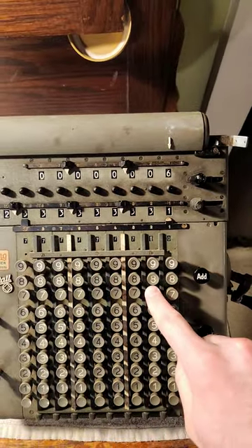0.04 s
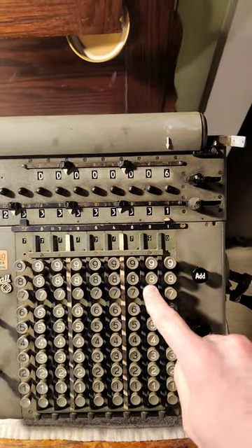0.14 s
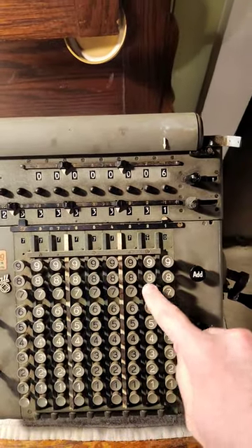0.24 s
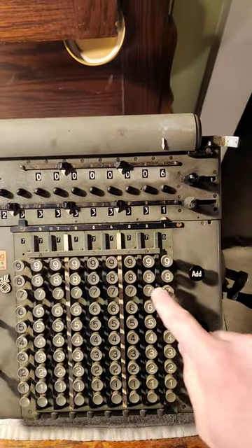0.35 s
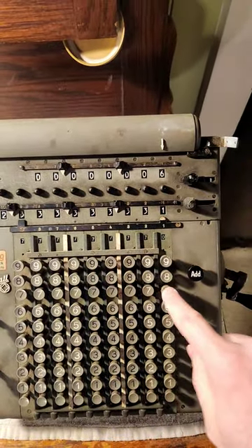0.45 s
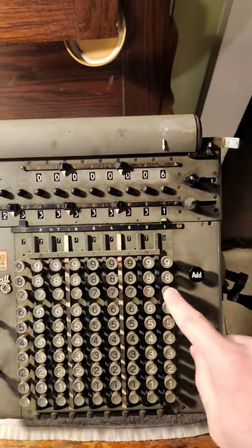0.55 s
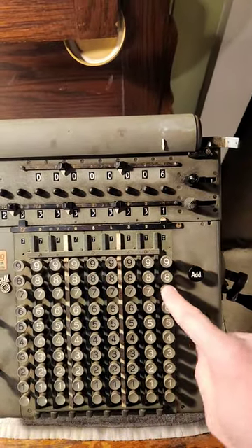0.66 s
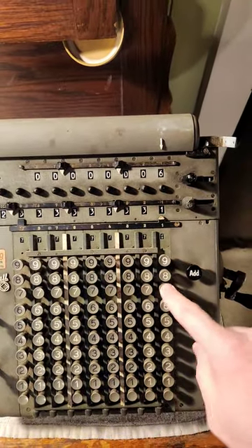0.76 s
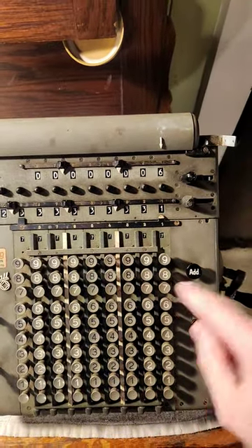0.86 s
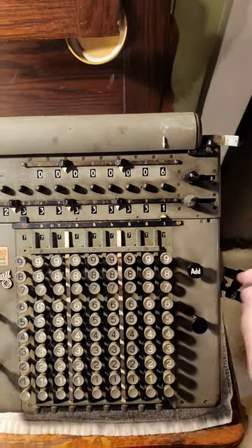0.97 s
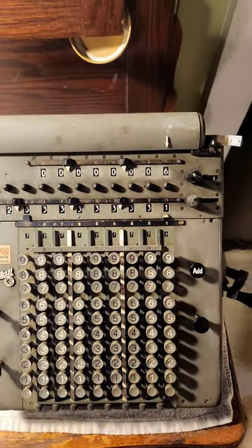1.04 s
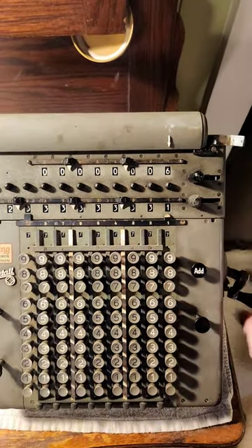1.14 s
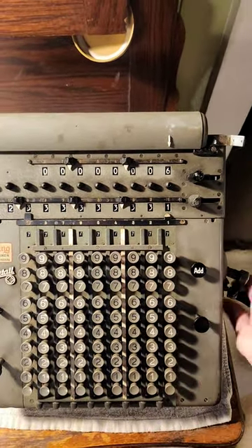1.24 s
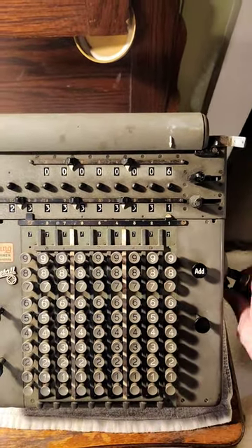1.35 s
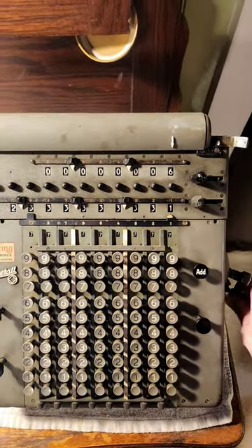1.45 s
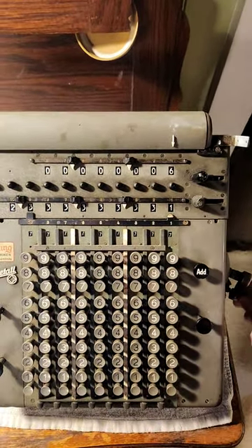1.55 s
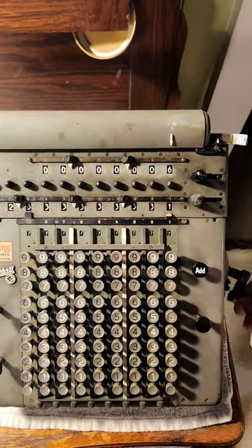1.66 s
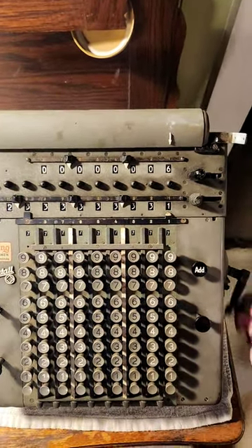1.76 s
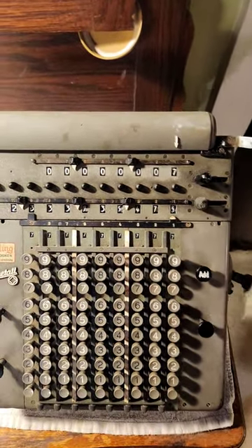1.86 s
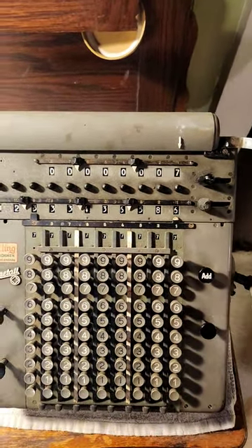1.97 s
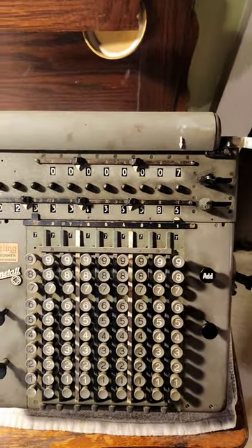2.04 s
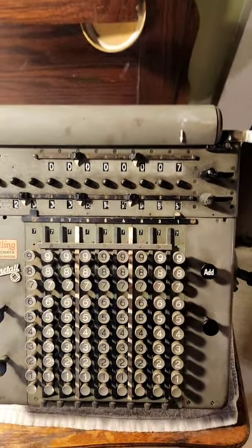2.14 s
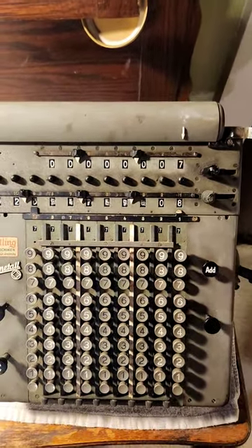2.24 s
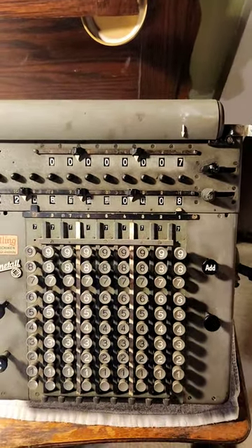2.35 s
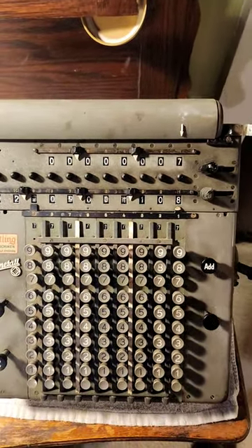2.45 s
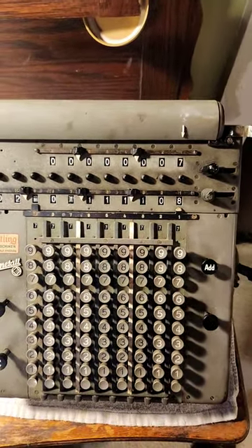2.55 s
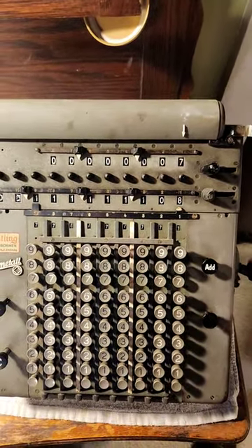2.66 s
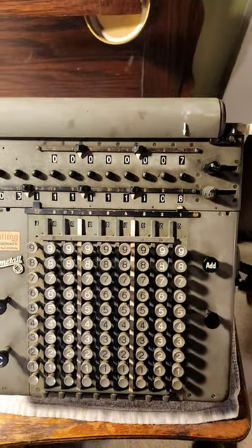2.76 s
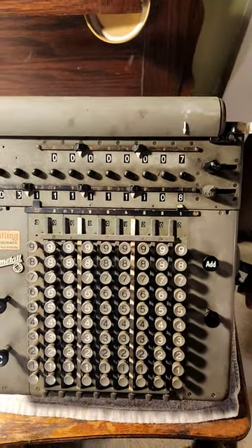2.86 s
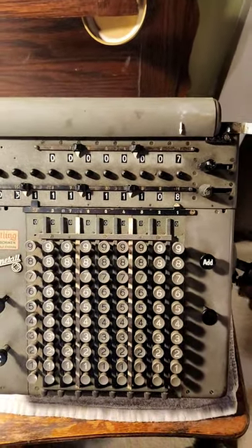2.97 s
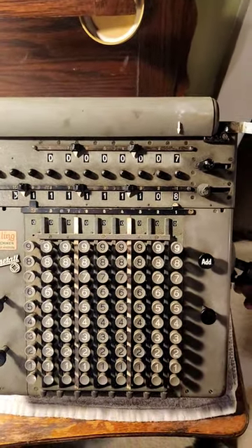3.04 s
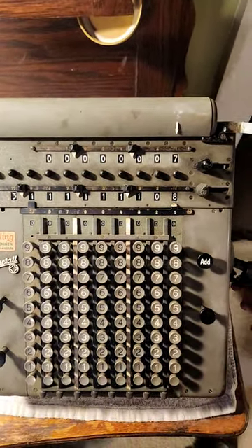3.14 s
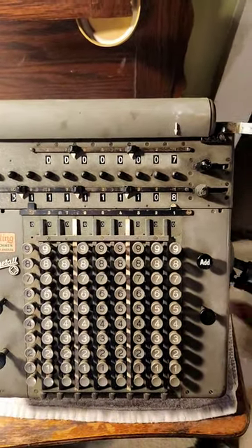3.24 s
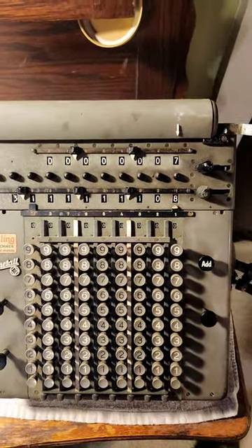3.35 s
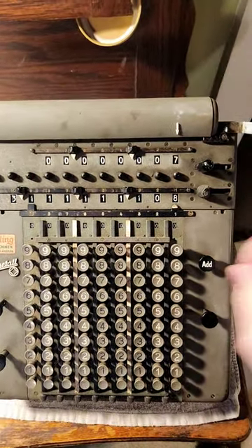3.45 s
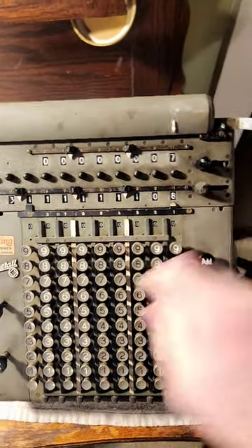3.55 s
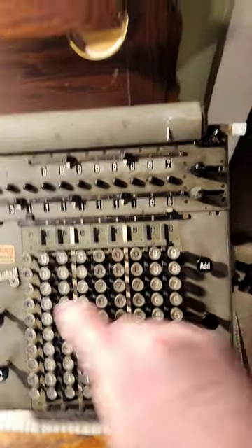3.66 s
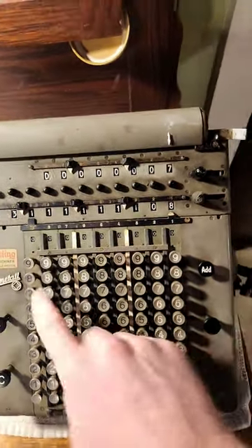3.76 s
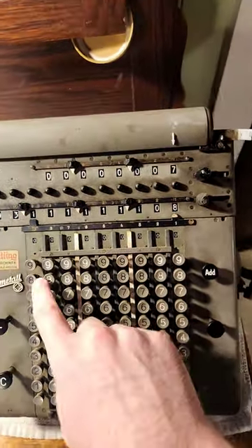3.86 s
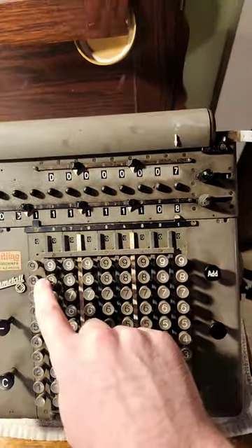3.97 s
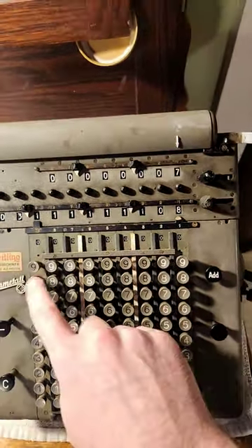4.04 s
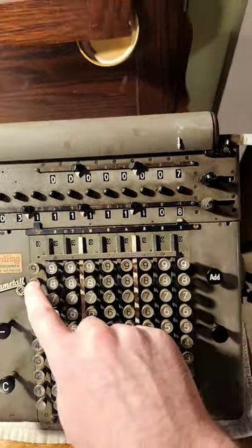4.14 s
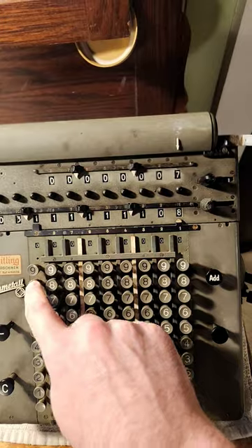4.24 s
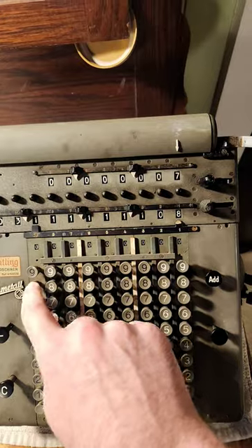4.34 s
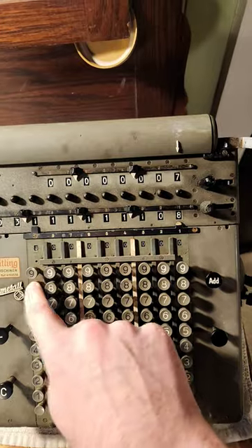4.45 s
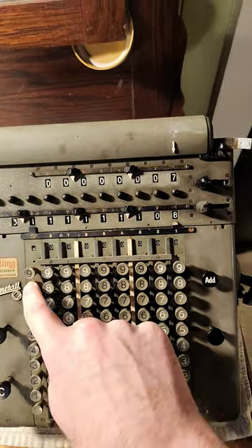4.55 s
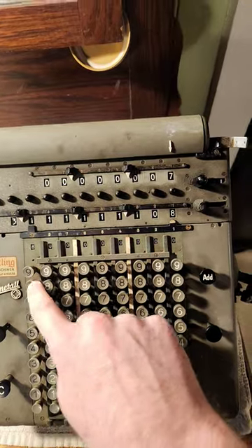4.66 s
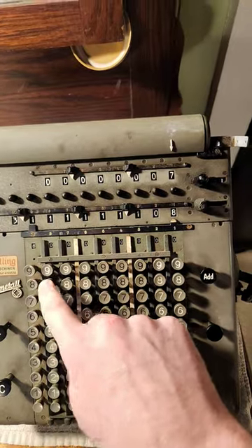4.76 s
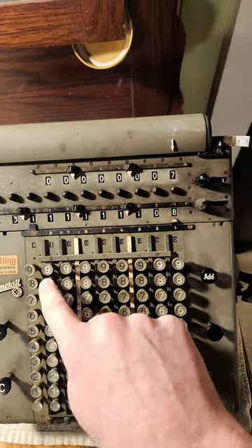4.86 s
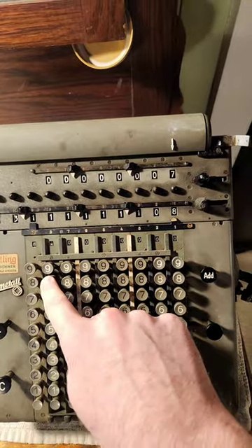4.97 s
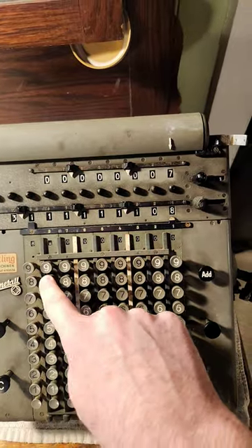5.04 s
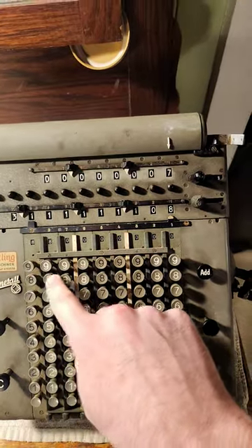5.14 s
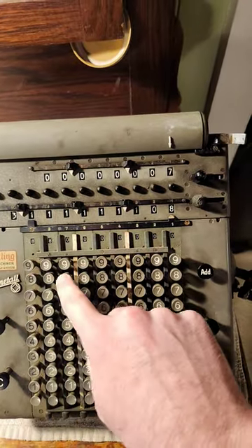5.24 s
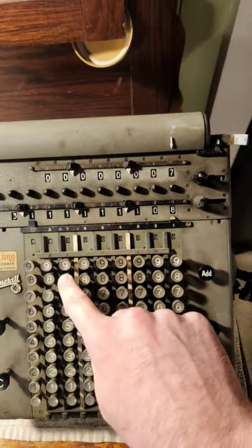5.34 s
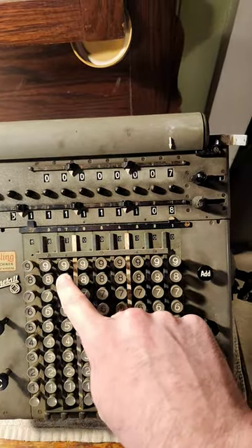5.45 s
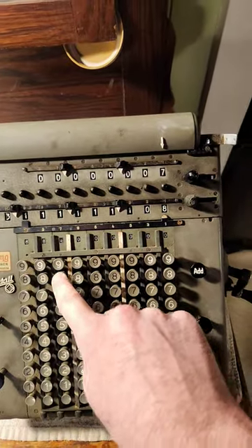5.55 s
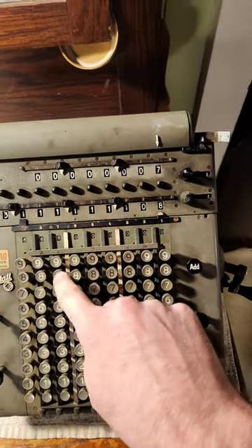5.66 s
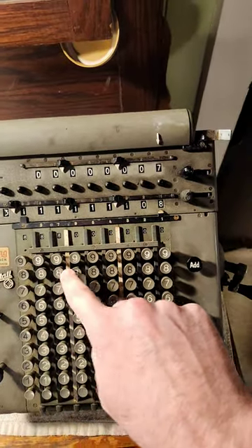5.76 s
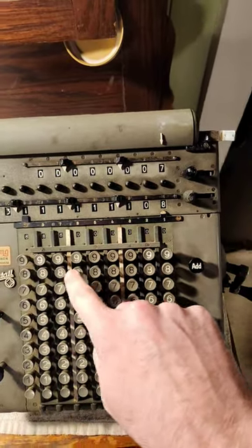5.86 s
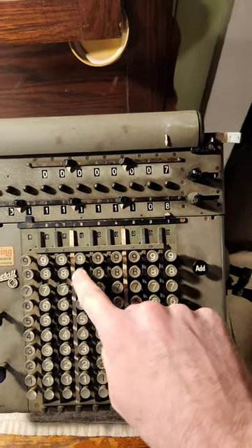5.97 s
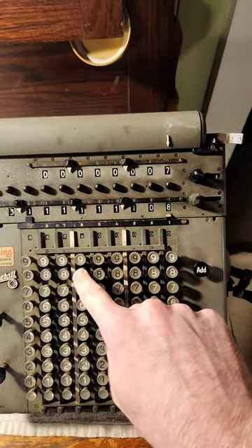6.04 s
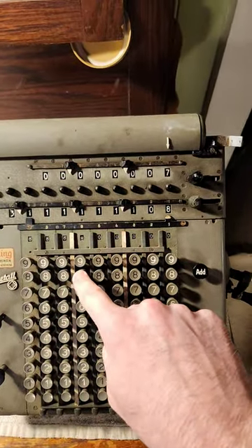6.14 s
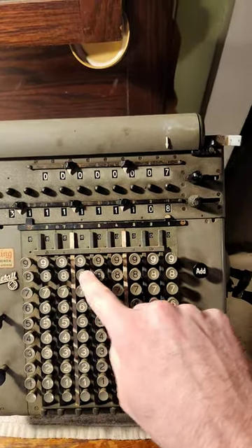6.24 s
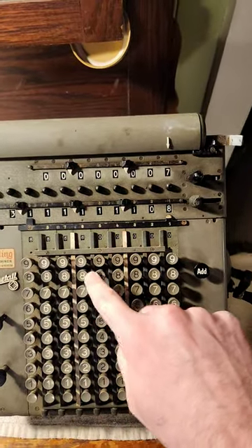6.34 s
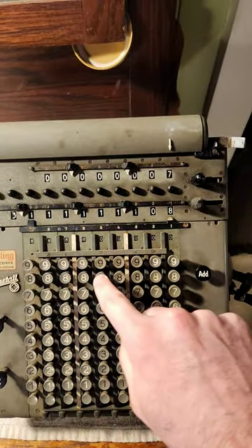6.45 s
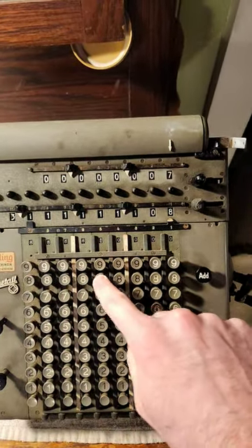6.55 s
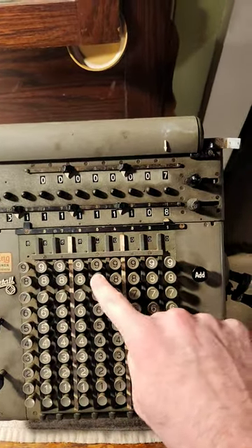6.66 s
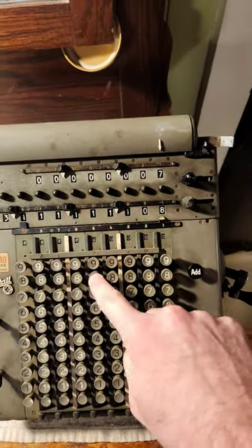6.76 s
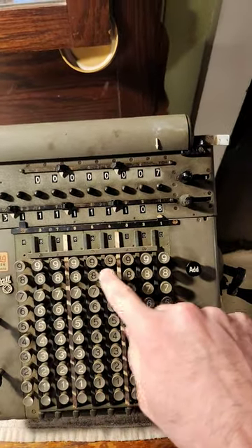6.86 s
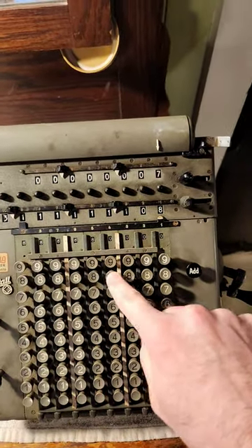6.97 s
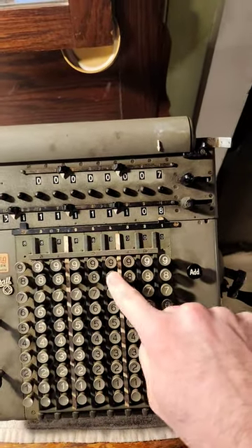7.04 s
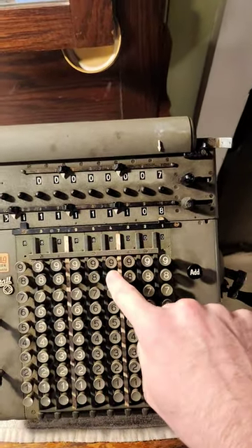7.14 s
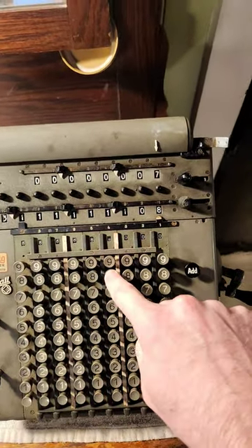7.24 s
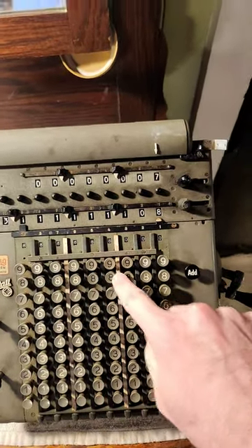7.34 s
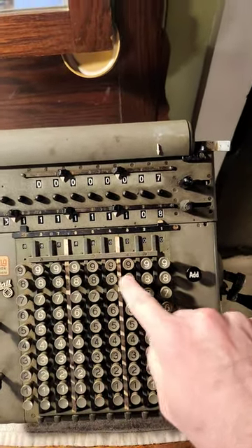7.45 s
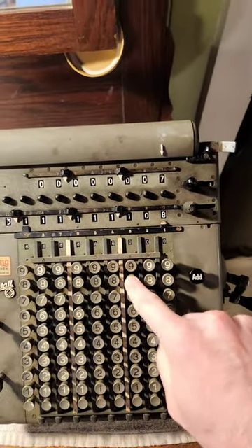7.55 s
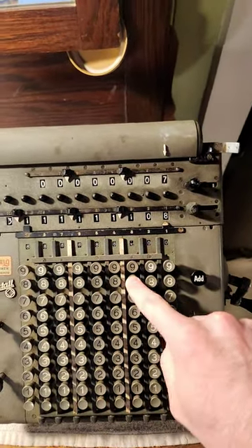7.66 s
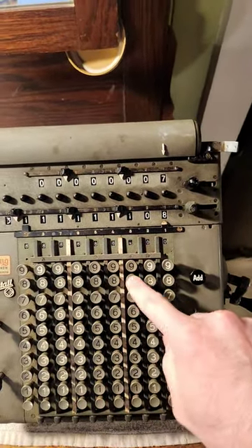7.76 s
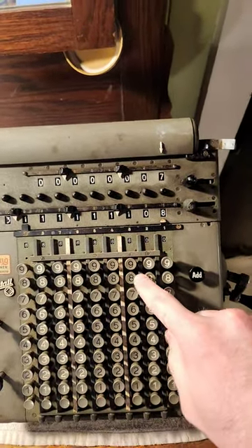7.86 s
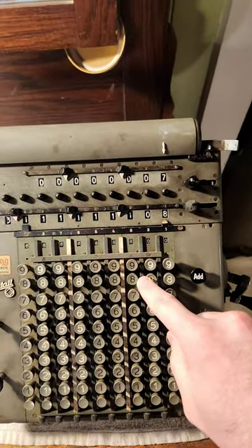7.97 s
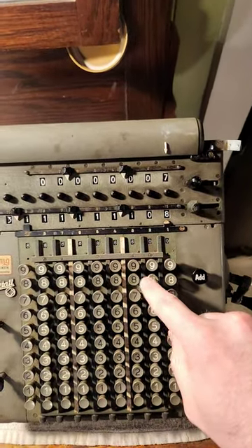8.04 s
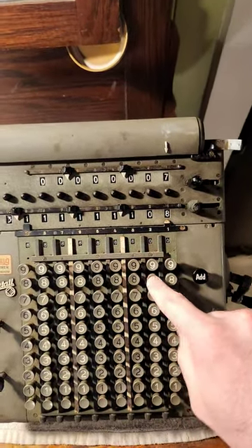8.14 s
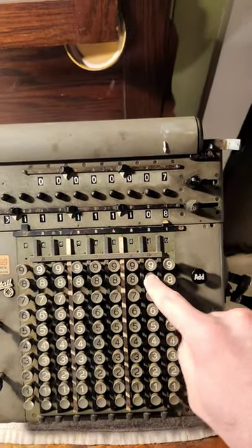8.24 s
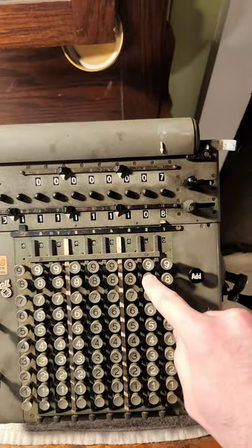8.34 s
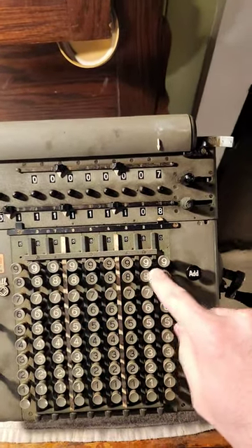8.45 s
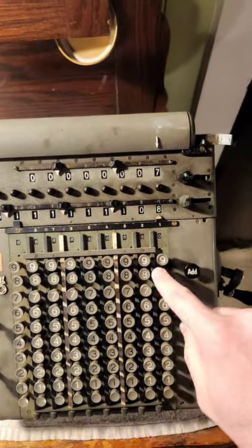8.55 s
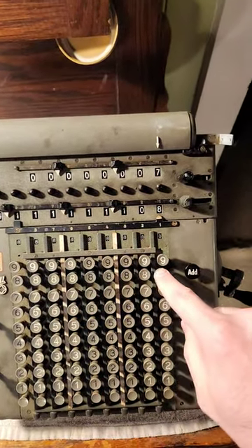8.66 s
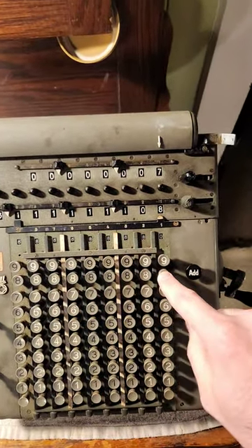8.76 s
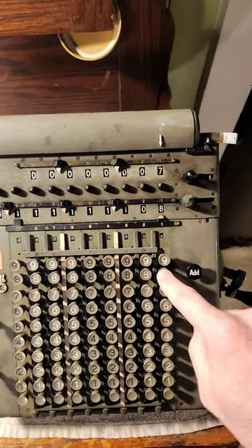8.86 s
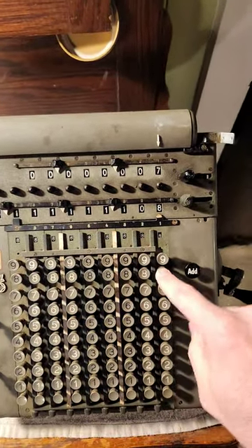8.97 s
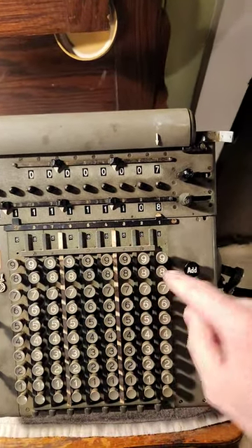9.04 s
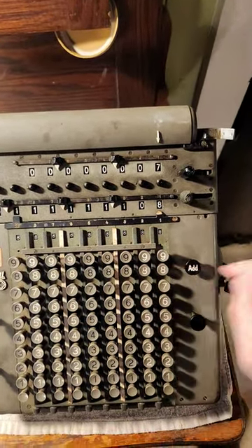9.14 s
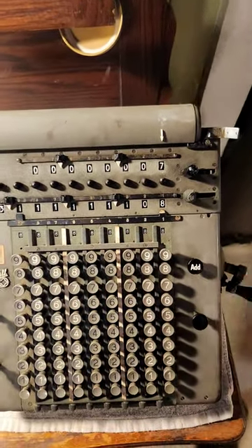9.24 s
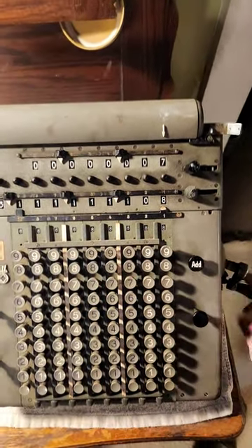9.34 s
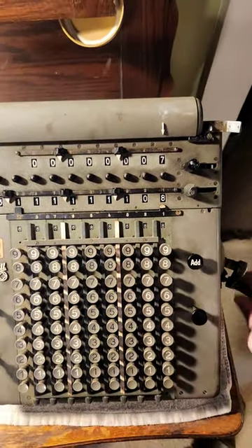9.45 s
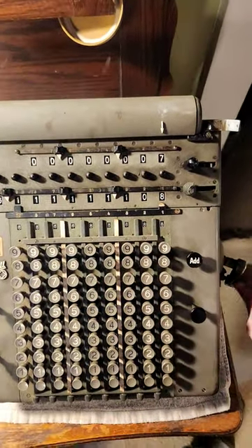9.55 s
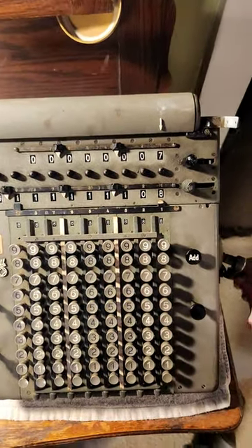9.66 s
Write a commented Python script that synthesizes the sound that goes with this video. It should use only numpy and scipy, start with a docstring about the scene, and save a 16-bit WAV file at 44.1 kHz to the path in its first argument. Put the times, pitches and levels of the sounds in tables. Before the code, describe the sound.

Two key clicks, a short rattling gear cycle ending in a sharp metallic clank, then slow, evenly spaced key presses on a heavy adding machine.

```python
"""An old mechanical calculator on a wooden table in a quiet room.
Two keys slide down and latch; the handle rubs; the add mechanism takes up slack and runs twice,
gears rattling and a pawl ticking, then hits its stop; nine more keys follow, with touches and lifts.
Contacts are impulses, rubs and gears trains of tiny impulses; they drive the decaying resonances
of the steel parts, the sheet-metal case and the table, over coloured-noise room tone."""
import sys
import numpy as np
from scipy import signal
from scipy.fft import rfft, irfft, next_fast_len
from scipy.io import wavfile
from scipy.ndimage import uniform_filter1d

SR = 44100
rng = np.random.default_rng(int(sys.argv[2]) if len(sys.argv) > 2 else 0)


def inscribe(sig):
    """Save sig as 16-bit PCM at rate SR to the path in sys.argv[1].

    A 1-D sig is mono; a 2-D sig holds one channel per row.
    Samples are clipped to [-1, 1] before scaling.
    """
    pcm = np.round(np.clip(np.atleast_2d(sig).T, -1, 1) * 32767)
    wavfile.write(sys.argv[1], SR, pcm.astype(np.int16))


N = 427769
RING_S, CUTOFF_HZ = .6, 15800
TIME = np.arange(N) / SR
AGE = np.arange(int(RING_S * SR)) / SR

# Event levels are drive levels: each body adds its own gain.
# key presses: [bottom t/s, slide lead/s, latch lead/s, slide level/dB, steel level/dB, case level/dB,
#  thud level/dB, plate level/dB, knock f/Hz, knock level/dB, clack f/Hz, clack level/dB]
KEYS = [(0.2109, 0.064, .001, -32, -26, -44.5, -52.5, -51, 610, -51, 1190, -45),
        (0.7220, 0.047, .009, -37, -19, -31.5, -63, -29.5, 507, -30, 1627, -26.5),
        (4.5650, 0.032, 0.0023, -22.5, -10.5, -25, -30, -21, 370, -13.5, 1350, -31.5),
        (5.0267, 0.034, 0.0042, -27.5, -11, -28, -32.5, -31.5, 320, -45, 1320, -28),
        (5.6115, .033, 0.015, -30.5, -16.5, -36, -32, -43, 318, -31, 1470, -44),
        (6.1360, 0.031, 0.0097, -32, -14, -34, -30, -36, 336, -39, 1710, -39),
        (6.7123, .020, .006, -26.5, -10.5, -25, -28, -37, 338, -41, 1100, -31),
        (7.1983, 0.051, .020, -32.5, -19, -38.5, -34.5, -48, 463, -32, 1310, -41),
        (7.7346, 0.06, 0.00102, -30.5, -19, -34, -39.5, -37, 592, -32, 1700, -33),
        (8.3357, .030, .002, -22, -10, -27.5, -28, -25, 420, -37, 1635, -31),
        (8.9498, .023, 0.0019, -18.5, -10, -25, -31.5, -29, 400, -26, 1160, -20)]
# latch relative to the bottoming that follows: [steel level/dB, case level/dB, thud level/dB]
LATCH_REL_DB = (-2.64, -5, -8)
# swell of the stem's scrape as its spring is loaded
SLIDE_SWELL_DB = 24
# finger lands lightly on a key: [t/s, steel level/dB]
TOUCHES = [(0.1357, -34), (0.681, -36), (4.943, -46), (5.523, -45.5), (6.0658, -38.5), (6.62, -52),
           (7.111, -40), (7.6784, -30.5), (8.2546, -45.5)]
TOUCH_CASE_DB = -53.5
# finger lifts, key springs back: [t/s, steel level/dB]
LIFTS = [(0.413, -31.5), (0.9135, -24), (4.7711, -50), (5.1373, -29), (5.7877, -46), (6.3327, -32.5),
         (6.916, -34.5), (7.3851, -37.5), (7.9092, -47.5), (8.5267, -48.5), (9.1217, -33.5)]
# rub level is relative to the lift's steel level
LIFT_CASE_DB, LIFT_RUB_REL_DB, LIFT_RUB_S = -50.5, -21, 0.011
# key spring settles in random ticks, weaker with age
SETTLE_FROM_S, SETTLE_TO_S = .04, .11
SETTLE_STEEL_DB, SETTLE_CASE_DB, SETTLE_DB_PER_S = -29.5, -53, 127.5
# key or lever rubs in its guide: [start t/s, length/s, level/dB]
RUBS = [(0.257, .069, -48), (0.752, .057, -44.5), (3.264, .046, -74)]
# single ticks and knocks (catches, levers, gear teeth, a finger on the case, two keys' second hits):
#  [t/s, steel level/dB, case level/dB]
TICKS = [(0.2578, -26, -45), (0.2873, -39, -66), (0.3354, -30, -55), (0.3581, -36, -49),
         (0.7377, -15, -31.5), (0.846, -38, -48), (1.447, -50, -49), (1.484, -44, -50), (1.5055, -36, -50),
         (1.8113, -27.5, -37), (1.8526, -28, -34.5), (1.91, -25, -40), (1.935, -18, -35),
         (2.0015, -10, -29.5), (2.0357, -15, -42), (3.002, -31, -44), (3.1283, -42, -50.5),
         (3.1859, -48, -58), (5.4395, -43.5, -56), (5.6783, -23, -48.5), (6.1491, -11.5, -31),
         (7.2374, -26, -52), (7.7889, -26, -49), (8.9034, -60, -45.5), (9.418, -53, -47)]

# gear train takes up slack, runs, runs again, rattles out against the stop: [start t/s, length/s,
#  steel level/dB, case level/dB, thud level/dB, sag/(dB/s), singing f/Hz, singing level/dB re steel]
RUNS = [(1.799, 0.12, -51.5, -42.5, -40.5, -95, 9420, -20), (1.927, 0.12, -25.5, -32, -43, 51, 9600, -8),
        (2.288, .480, -28, -32, -43.5, 34, 12280, -8), (2.8, 0.068, -19, -28.5, -37.5, 150.5, 12600, -11.5)]
RUN_ATTACK_S, RUN_RELEASE_S = .012, .025
# share of a run's sag heard in each body: [steel, case, table]
SAG_SHARE = (1, .55, .3)
# offset from the singing f, as a share of it; the peak ends at twice this
SINGING_WIDTH = 0.064
# ratchet pawl in the long run, each gap a little shorter than the last
PAWL_START_S, PAWL_GAP_S, PAWL_QUICKEN_S = 2.298, .0382, .00058
PAWL_DB = -26.5
# mechanism hits its stop and comes to rest: [t/s, steel level/dB, case level/dB, thud level/dB,
#  plate level/dB, knock f/Hz, knock level/dB, clack f/Hz, clack level/dB]
STOP = [(2.797, -4.5, -36, -37.5, -38.5, 604, -39, 1600, -34),
        (2.817, -6.5, -29, -36.5, -29, 342, -37, 1540, -31),
        (2.8601, -19, -31.5, -26, -41.5, 318, -34, 1750, -31)]
# handle rubs dully as taken up, hardest at first: [start t/s, length/s, level/dB, fade/(dB/s)]
HANDLE = (1.445, .068, -49, 100)
# colour of the handle's rub: [f/Hz, level/dB per Hz]
HANDLE_TONE = [(400, -18), (800, 6), (1500, -5), (2000, 1), (2550, 3), (3300, -19), (7000, -17),
               (15000, -40)]

# dense resonances of the steel parts: [f/Hz, level/dB per Hz]
STEEL = [(900, -25.5), (1600, -3.5), (2200, -2), (3200, -3.5), (4200, -2.5), (5300, 0.5), (6300, -1.5),
         (7600, 1.5), (9000, -2), (10700, -6.5), (12600, 3), (15500, -1.5)]
# dense resonances of the case: [f/Hz, level/dB per Hz]
CASE = [(150, -10), (330, 2), (600, -4.5), (850, 3.5), (1150, -4), (1600, -4.5), (2200, -8), (3500, -15)]
# separate modes of the sheet-metal case: [f/Hz, level/dB, t60/s]
CASE_MODES = [(303, -3.5, 0.21), (384, -5.5, 0.15), (492, -5, .08), (598.4, -7.5, 0.086), (761, -1.5, 0.16),
              (814, -0.5, 0.054), (895, -10.5, 0.029), (1096, -2.5, 0.036), (1355, -7, .08),
              (1902, -6, 0.07)]
# note of the top plate
PLATE_HZ, PLATE_T60_S = 778.5, 0.15
# machine on its table: [f/Hz, level/dB, t60/s]
TABLE_MODES = [(55.7, -15, .16), (75, -10, 0.2), (122, -8.5, .15), (151.4, 2.5, 0.27), (165.1, -5.5, 0.14),
               (238, -6.5, 0.062), (278.3, -11.5, 0.08)]
# dull boom of the table top: [f/Hz, level/dB per Hz]
BOOM = [(20, -23), (55, -9), (78, -3), (100, -14), (145, 2), (195, -4.5), (245, 0), (330, -8.5),
        (500, -22.5), (1200, -55.5)]
# machine rocks back after a blow; level relative to the thud
ROCK_AFTER_S, ROCK_REL_DB = .048, -12
# hand rocks the machine: [t/s, level/dB]
LEANS = [(1.872, -33), (4.936, -42.5)]

# colour of the room tone: [f/Hz, level/dB per Hz]
ROOM_TONE = [(22, -21), (50, -9.5), (90, -12), (130, -9.5), (240, -7), (365, -1), (620, -16.5), (1250, -25),
             (1750, -24.5), (2500, -38), (3700, -43.5), (7500, -35.5), (11000, -43), (16000, -41.5)]
# rms of the room tone: [t/s, level/dB]
ROOM_LEVEL = [(0, -58.5), (1.401, -59), (1.8, -54.5), (2.8, -55), (3.2, -64), (4.35, -62), (4.641, -57.5),
              (9.7, -58.7)]
# left-right correlation of noise: [f/Hz, correlation]
LIKENESS = [(100, 1), (300, 0.93), (600, 0.74), (1100, -0.29), (2000, -0.024), (4000, -0.033),
            (16000, 0.025)]
# left-right balance of noise: [f/Hz, left minus right level/dB]
LEAN = [(150, 3.5), (1000, -2.3), (2500, 1.5), (4500, -0.5), (6500, -2), (9000, 5.5), (13000, 3),
        (16000, 4)]


def steel_parts(blows, slide):
    """Bright clatter of levers, stems and gear teeth: eight parts, each with its own dense resonance."""
    heavy = clicks(blows[:, 0], blows[:, 1])
    bounces = from_db(-8.0) * shaken(heavy, t60_s=.05) + from_db(-25.0) * shaken(heavy, t60_s=0.22)
    chatter = (bounces + from_db(1) * slide) * grains(per_s=1100, spread_db=7.0)
    teeth = from_db(3) * gears(body=0) + shaken(pawl(count=15), t60_s=0.065)
    force = from_db(8.5) * heavy + chatter + teeth * grains(per_s=330, spread_db=5.0)
    out = 0
    for share in dealt(force, count=8, size=48):
        response = dense(varied_steel(2.0), crack_db=1.5, crack_t60_s=.005, ring_t60_s=.06,
                         room_db=-12.0, room_t60_s=0.19)
        out = out + sounded(share, response, pan_db=0)
    return out


def varied_steel(spread_db):
    """Steel spectrum with random band levels: no two parts resonate alike."""
    return [(hz, db + spread_db * rng.standard_normal()) for hz, db in STEEL]


def strikes():
    """Keys hitting bottom and the mechanism hitting its stop; rows as in STOP."""
    return np.array([(s, *sound) for s, _, _, _, *sound in KEYS] + STOP)


def latches():
    """Latch catches just before bottom: [t/s, steel level/dB, case level/dB, thud level/dB]."""
    keys = np.array(KEYS)
    return np.column_stack([keys[:, 0] - keys[:, 2], keys[:, 4:7] + LATCH_REL_DB])


def scraping():
    """Friction of stems: swells up to the latch, holds to the bottom, returns briefly at the lift."""
    force = np.zeros(N)
    lift_rubs = [(s, LIFT_RUB_S, db + LIFT_RUB_REL_DB) for s, db in LIFTS]
    for s, length, db in RUBS + lift_rubs:
        force[during(s, length)] += from_db(db)
    for s, slide, latch, slide_db, *_ in KEYS:
        down = during(s - slide, slide)
        swell_db = np.interp(TIME[down], [s - slide, s - latch], [-SLIDE_SWELL_DB, 0])
        force[down] += from_db(slide_db + swell_db)
    return force


def key_ticks(count):
    """Light contacts around each press: touch, settling spring, lift; rows as in TICKS."""
    rows = [(s, db, TOUCH_CASE_DB) for s, db in TOUCHES]
    rows += [(s, db, LIFT_CASE_DB) for s, db in LIFTS]
    for s, *_ in KEYS:
        for age in SETTLE_FROM_S + (SETTLE_TO_S - SETTLE_FROM_S) * rng.random(count):
            loss_db = SETTLE_DB_PER_S * age
            rows.append((s + age, SETTLE_STEEL_DB - loss_db, SETTLE_CASE_DB - loss_db))
    return rows


def light_ticks(ticks):
    """Single ticks and knocks on steel: each has its own colour, bounces once and dies quickly."""
    out = np.zeros((2, N + len(AGE)))
    for s, db, _ in ticks:
        response = dense(varied_steel(2.3), crack_db=3.5, crack_t60_s=0.0037, ring_t60_s=0.05,
                         room_db=-9.5, room_t60_s=.16)
        tick = from_db(db + 10.5) * response
        at = round(s * SR)
        again = round((s + rng.uniform(.002, 0.0055)) * SR)
        out[:, at:at + len(AGE)] += tick
        out[:, again:again + len(AGE)] += from_db(-5.0) * tick
    return out[:, :N]


def run_shape(start, length, sag_db_per_s):
    """A run picks up quickly, changes in dB at the sag rate (negative: grows), and lets go."""
    gate = np.interp(TIME - start, [0, RUN_ATTACK_S, length, length + RUN_RELEASE_S], [0, 1, 1, 0])
    return gate * from_db(-sag_db_per_s * np.clip(TIME - start, 0, length))


def gears(body):
    """Force envelope of the gear train on one body (0 steel, 1 case, 2 table)."""
    return sum(from_db(levels[body]) * run_shape(s, length, sag * SAG_SHARE[body])
               for s, length, *levels, sag, _, _ in RUNS)


def pawl(count):
    """The pawl drops over the ratchet: one impulse for each tooth."""
    gaps = PAWL_GAP_S - PAWL_QUICKEN_S * np.arange(count - 1)
    return clicks(PAWL_START_S + np.append(0, np.cumsum(gaps)), PAWL_DB)


def singing_gears():
    """In each run the teeth keep one narrow steel resonance ringing."""
    out = 0
    for s, length, steel_db, _, _, sag, hz, singing_db in RUNS:
        force = from_db(steel_db + singing_db) * run_shape(s, length, sag)
        peak = [(hz * (1 - 2 * SINGING_WIDTH), -40), (hz, 0), (hz * (1 + 2 * SINGING_WIDTH), -40)]
        response = unit_energy(stereo_noise(peak, size=len(AGE)) * dying(0.077))
        out = out + sounded(force * grains(per_s=740, spread_db=0), response, pan_db=0.5)
    return out


def handle():
    """Stick and slip in the handle's bearing: fading grains through a short coloured ring."""
    s, length, db, fade_db_per_s = HANDLE
    envelope = from_db(db - fade_db_per_s * np.clip(TIME - s, 0, length)) * during(s, length)
    response = unit_energy(stereo_noise(HANDLE_TONE, size=len(AGE)) * dying(0.025))
    return sounded(envelope * grains(per_s=1000, spread_db=7), response, pan_db=2.5)


def case(blows, ticks, slide):
    """Hollow clack of the housing: separate panel modes plus a dense wash."""
    heavy, light = clicks(blows[:, 0], blows[:, 2]), clicks(ticks[:, 0], ticks[:, 2])
    chatter = from_db(-1.5) * shaken(heavy, t60_s=.1) + from_db(-5.0) * shaken(light, t60_s=0.086)
    chatter = chatter + from_db(-4) * slide
    keys = from_db(20.5) * (heavy + light) + chatter * grains(per_s=1500, spread_db=4.5)
    drive = gears(body=1) * grains(per_s=450, spread_db=11.0)
    panels = modal(CASE_MODES, lag_s=0.000054)
    wash = dense(CASE, crack_db=0.5, crack_t60_s=0.0033, ring_t60_s=0.071, room_db=-3, room_t60_s=0.24)
    return (sounded(from_db(-6.5) * keys + from_db(-9) * drive, panels, pan_db=3.5)
            + sounded(from_db(-1.0) * keys + from_db(-0.5) * drive, wash, pan_db=0))


def panel_notes(blows):
    """Each blow sounds the top plate and the two panel notes of the place where it lands."""
    out = np.zeros((2, N + len(AGE)))
    plate = modal([(PLATE_HZ, 0, PLATE_T60_S)], lag_s=0.00013)
    for s, _, _, _, plate_db, knock_hz, knock_db, clack_hz, clack_db in blows:
        knock = from_db(knock_db + 15.5) * modal([(knock_hz, 0, .085)], lag_s=.00006)
        clack = from_db(clack_db + 18.5) * modal([(clack_hz, 0, .06)], lag_s=0.00055)
        at = round(s * SR)
        out[:, at:at + len(AGE)] += from_db(plate_db + 25.5) * plate + knock + clack
    return out[:, :N]


def plate_drone():
    """Turning gears keep the top plate singing, unsteady in pitch and strength."""
    waver, throb = (x / x.std() for x in uniform_filter1d(rng.standard_normal((2, N)), size=550))
    phase = 2 * np.pi * np.cumsum(PLATE_HZ + 19 * waver) / SR
    build_up = shaken(gears(body=0), t60_s=.05) / dying(.05).sum()
    right_lag_rad = np.array([[0], [.5]])
    return build_up * from_db(-4.5 + 2 * throb) * np.sin(phase - right_lag_rad)


def table(blows):
    """Heavy blows ring the table and rock the machine on it; the gears only make it rumble."""
    heavy = clicks(blows[:, 0], blows[:, 3])
    rocks_back = clicks(blows[:, 0] + ROCK_AFTER_S, blows[:, 3] + ROCK_REL_DB)
    bumps = rocks_back + clicks(*np.transpose(LEANS))
    rumble = from_db(-3.5) * gears(body=2) + from_db(-7.5) * shaken(heavy, t60_s=0.29)
    boom = unit_energy(stereo_noise(BOOM, size=len(AGE)) * dying(0.12))
    boom_force = from_db(20.5) * heavy + rumble * grains(per_s=1500, spread_db=4.5)
    booming = sounded(boom_force, boom, pan_db=-1)
    ring_force = from_db(27.5) * heavy + from_db(19) * bumps
    ringing = sounded(ring_force, modal(TABLE_MODES, lag_s=.00003), pan_db=2.0)
    rock_modes = modal([(52.4, -2, 0.18), (76, 0, 0.13)], lag_s=.00003)
    rocking = sounded(from_db(22.5) * bumps, rock_modes, pan_db=0)
    high_pass = signal.butter(2, 28, "high", fs=SR, output="sos")
    return signal.sosfilt(high_pass, booming + ringing + rocking)


def room_tone():
    """A soft rush of air: coloured noise with a slowly changing level."""
    s, db = np.transpose(ROOM_LEVEL)
    noise = stereo_noise(ROOM_TONE, size=next_fast_len(N, True))[:, :N]
    return from_db(np.interp(TIME, s, db)) * noise


def clicks(times_s, levels_db):
    """One impulse for each contact."""
    out = np.zeros(N)
    at = np.clip(np.round(times_s * SR).astype(int), 0, N - 1)
    np.add.at(out, at, from_db(levels_db))
    return out


def grains(per_s, spread_db):
    """Tiny contacts of uneven size, unevenly spaced; rms 1."""
    step = SR / per_s
    count = int(N / step)
    place, size, sign = rng.random((count, 3)).T
    x = np.zeros(N)
    at = ((np.arange(count) + place) * step).astype(int)
    x[at] = np.sign(sign - .5) * from_db(spread_db * (2 * size - 1))
    return x / x.std()


def shaken(blows, t60_s):
    """Envelope of loose parts that go on chattering for a moment after each blow."""
    return signal.fftconvolve(blows, dying(t60_s))[:N]


def dealt(force, count, size):
    """Hand each short stretch of a force (size in samples) to one of several parts."""
    owner = np.repeat(rng.integers(0, count, N // size + 1), size)[:N]
    return [force * (owner == k) for k in range(count)]


def during(start_s, length_s):
    """True while something lasts."""
    return (TIME >= start_s) * (TIME < start_s + length_s)


def modal(modes, lag_s):
    """Decaying sines, alternating in sign, that reach the right channel a little late."""
    age = np.maximum(AGE - np.array([[0], [abs(lag_s)]]), 0)
    out = 0
    for k, (hz, db, t60_s) in enumerate(modes):
        out = out + (-1) ** k * from_db(db) * dying(t60_s) * np.sin(2 * np.pi * hz * age)
    return unit_energy(out)


def dense(spectrum, crack_db, crack_t60_s, ring_t60_s, room_db, room_t60_s):
    """Countless close modes as decaying noise: a crack, a short ring and the tail of the room."""
    crack = from_db(crack_db) * dying(crack_t60_s)
    tail = from_db(room_db) * dying(room_t60_s)
    return unit_energy(stereo_noise(spectrum, size=len(AGE)) * (crack + dying(ring_t60_s) + tail))


def sounded(force, response, pan_db):
    """A force convolved with a body's response; pan is left minus right."""
    return signal.fftconvolve(force[None], response, axes=1)[:, :N] * from_db([[pan_db / 2], [-pan_db / 2]])


def stereo_noise(spectrum, size):
    """Coloured noise with left-right correlation and balance set by frequency; rms 1."""
    hz = np.arange(size // 2 + 1) * SR / size
    alike = np.clip(at_hz(LIKENESS, hz), -1, 1)
    mid, side = rfft(rng.standard_normal((2, size)))
    ears = np.array([[1], [-1]])
    gain = from_db(at_hz(spectrum, hz) + ears * at_hz(LEAN, hz) / 2)
    x = irfft(gain * (np.sqrt(1 + alike) * mid + np.sqrt(1 - alike) * side * ears), size)
    return x / x.std()


def at_hz(points, hz):
    """Interpolate a table over log frequency."""
    f, value = np.transpose(points)
    return np.interp(np.log(hz + 1), np.log(f), value)


def dying(t60_s):
    """Exponential decay, -60 dB at t60."""
    return np.exp(-np.log(1000) * AGE / max(t60_s, 1e-4))


def unit_energy(x):
    """Scale a stereo response to unit energy, averaged over the channels."""
    return x / np.sqrt(np.mean(np.sum(x ** 2, axis=-1)))


def from_db(db):
    """dB to amplitude."""
    return 10 ** (np.asarray(db) / 20)


def scene():
    """Keys and gears drive the steel parts, the housing and the table, over the room tone."""
    blows = np.vstack([strikes()[:, :4], latches()])
    ticks, slide = np.array(key_ticks(count=2) + TICKS), scraping()
    works = steel_parts(blows, slide) + light_ticks(ticks) + singing_gears() + handle()
    housing = case(blows, ticks, slide) + panel_notes(strikes()) + plate_drone()
    return works + housing + table(blows) + room_tone()


def record(dry):
    """Steep elliptic low-pass."""
    return signal.sosfilt(signal.ellip(12, .2, 95, CUTOFF_HZ, fs=SR, output="sos"), dry)


dry = scene()
out = record(dry)
inscribe(out)
```